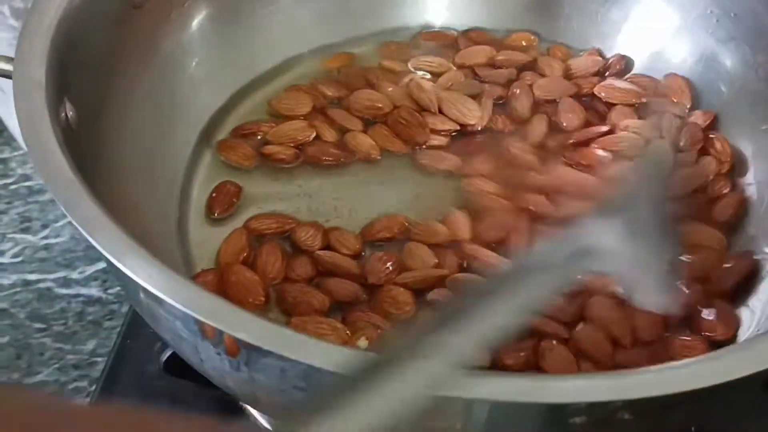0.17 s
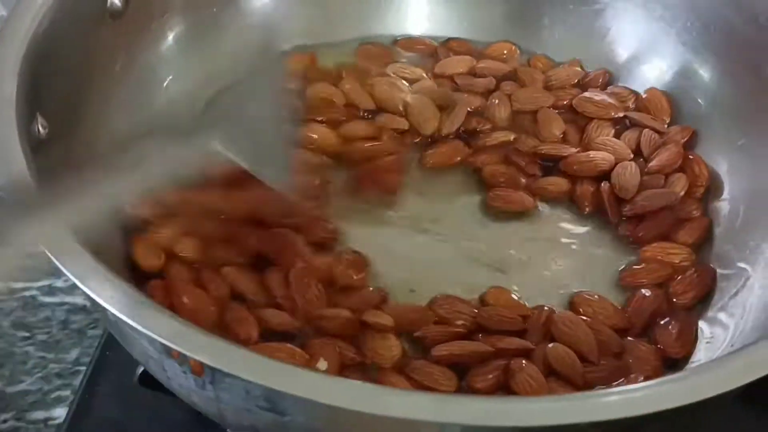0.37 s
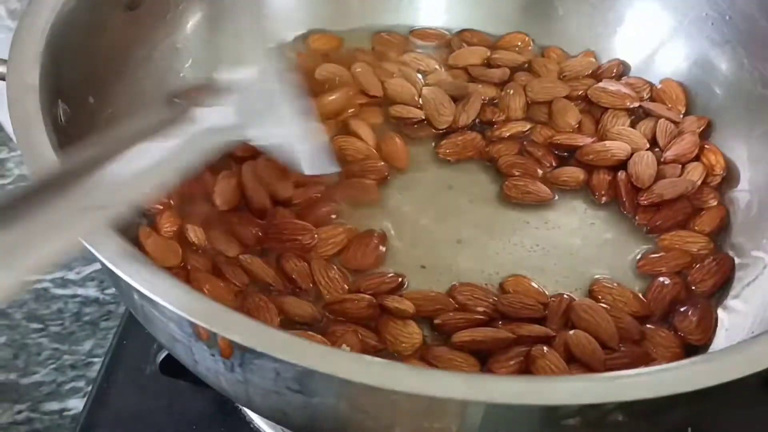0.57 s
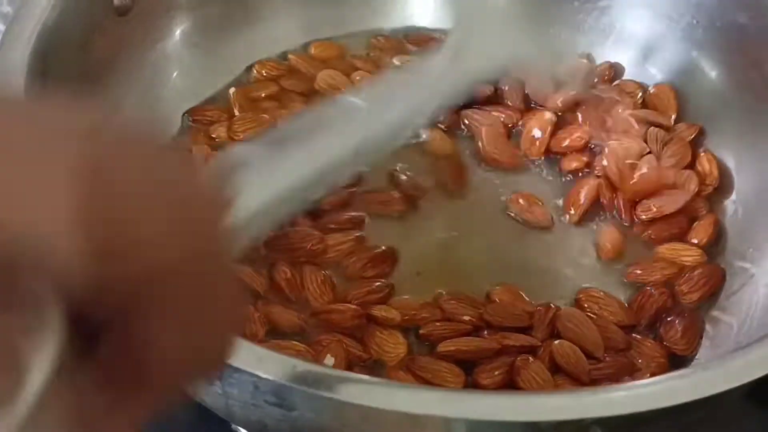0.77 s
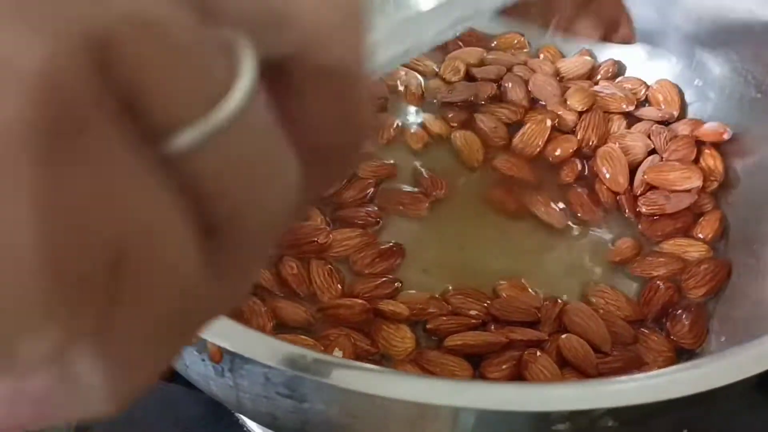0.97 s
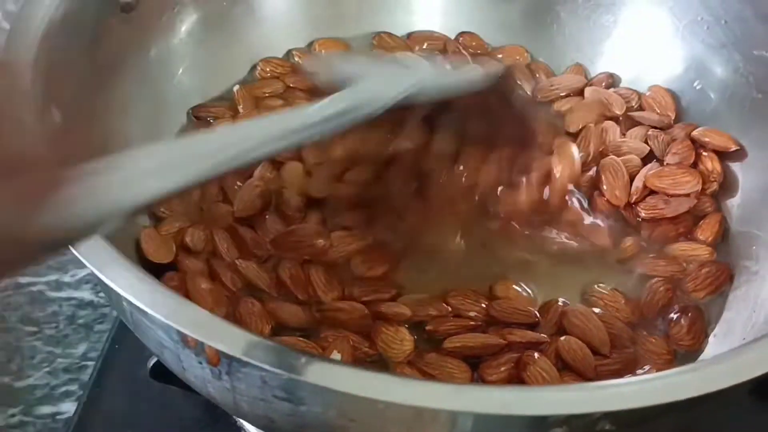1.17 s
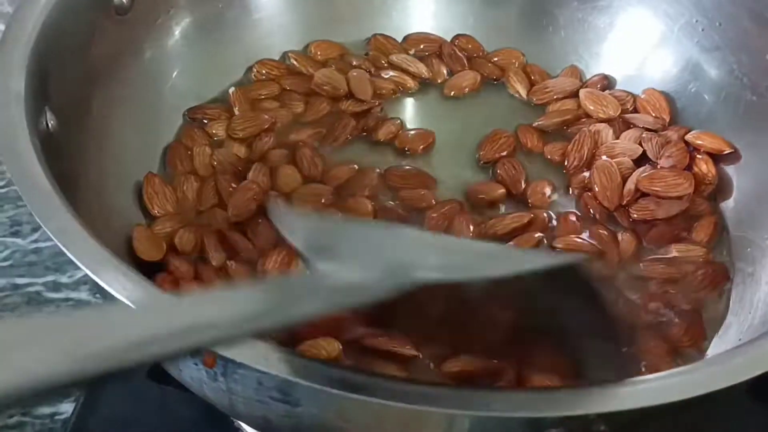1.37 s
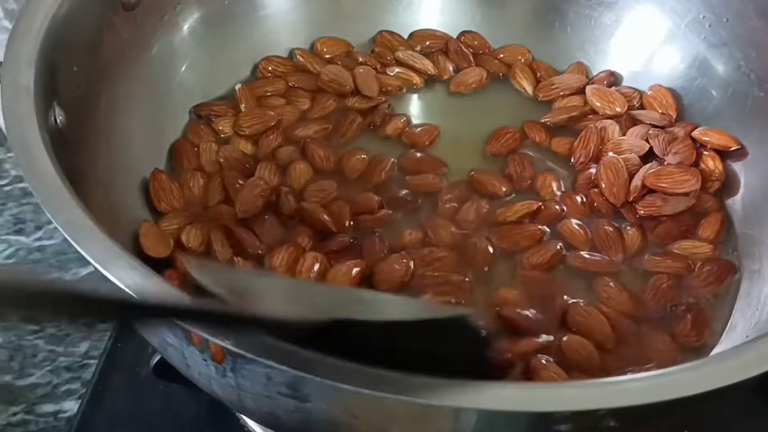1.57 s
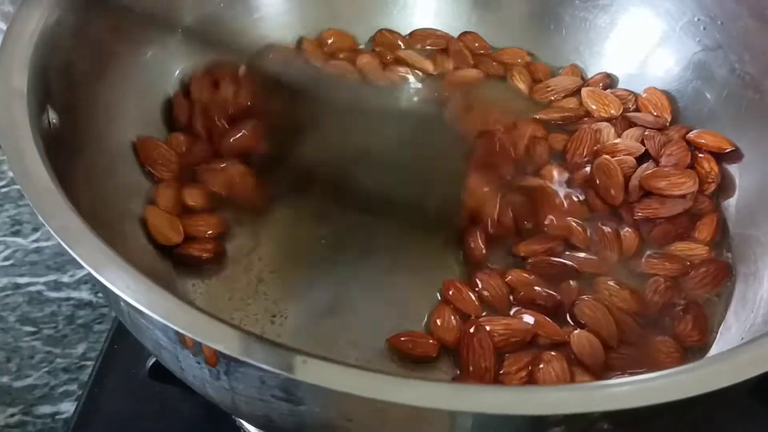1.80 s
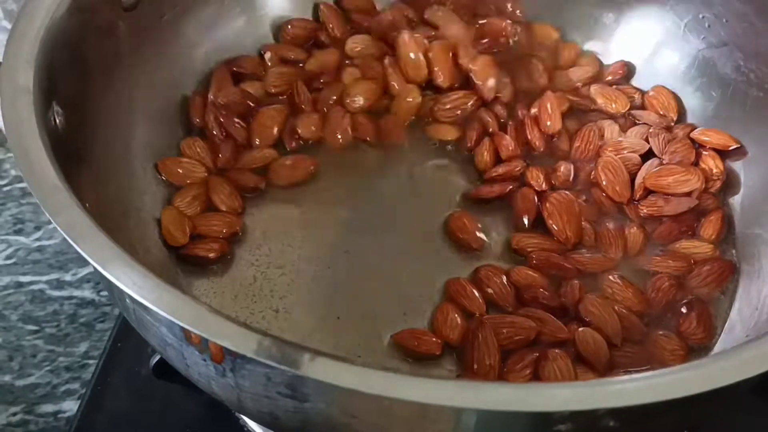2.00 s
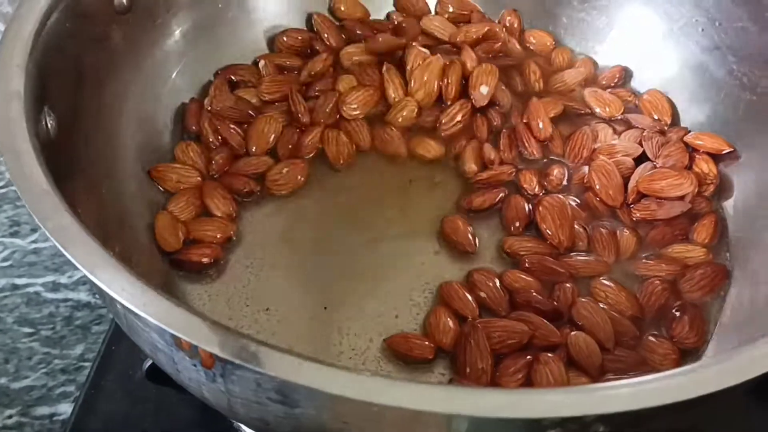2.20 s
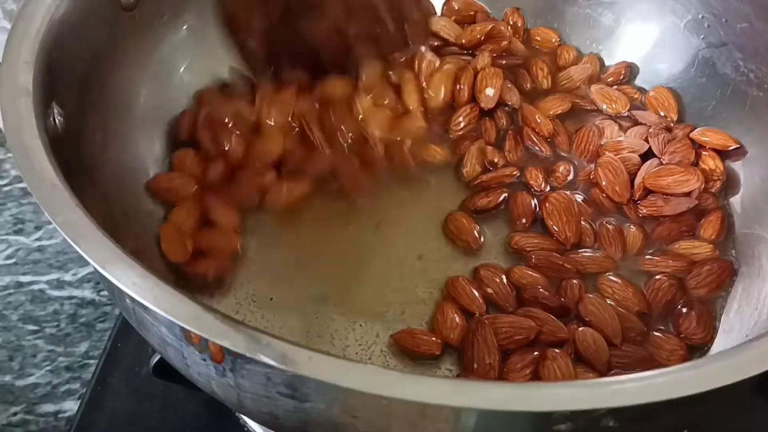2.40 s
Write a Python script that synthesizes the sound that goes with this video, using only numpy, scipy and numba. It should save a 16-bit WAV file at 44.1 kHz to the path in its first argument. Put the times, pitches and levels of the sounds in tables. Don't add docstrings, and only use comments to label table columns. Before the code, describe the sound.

Close stereo phone pickup, louder on the left, of a metal spoon scraping a ringing steel pan of nuts; sharp clinks, short singing tones and knocks, a momentary silence midway, then lighter strokes over faint kitchen noise.

```python
import sys
import numpy as np
from scipy import signal
from scipy.fft import rfft, irfft
from scipy.io import wavfile
from scipy.ndimage import uniform_filter1d
from numba import njit

SR = 44100
rng = np.random.default_rng(int(sys.argv[2]) if len(sys.argv) > 2 else 0)


def store_pcm(level_fs):
    pcm = np.round(np.clip(level_fs, -1, 1) * 32767).astype(np.int16)
    wavfile.write(sys.argv[1], SR, np.atleast_2d(pcm).T)


def linear_from_db(decibels):
    return 10 ** (np.asarray(decibels, float) / 20)


N = 108045

BOWL_LUCK = .4


# start_s,
# level_db, treble_tilt_db_per_octave, loudest_hz, ring_length_share
SPOON_CLINKS = [(0.0, -30.5, -4, 770, 0.57), (0.193, -30, 2, 2000, 0.67), (0.2145, -1.5, 1, 2940, 0.28),
                (0.67, -25.5, -1, 3500, 0.45), (0.86, -31, -1.5, 2970, 0.75),
                (0.989, -32, 3.5, 10800, 0.093), (1.071, -11.5, 10, 6750, 1), (1.091, -27, -5, 2290, 0.62),
                (1.211, -8.5, 8.5, 7220, 0.75), (1.241, -17.5, 14.5, 5920, 1), (1.314, -1.5, 1.5, 990, 0.1),
                (1.556, -27, -6.5, 1300, 0.67), (1.623, -46, -5, 1500, 0.14), (1.843, -15, 8.5, 2600, 0.53),
                (1.957, -27.5, 10.5, 12300, 0.96), (2.003, -28.5, -1.5, 2270, 0.28),
                (2.084, -25, -3, 2860, 0.081), (2.128, -7, 6, 2000, 0.2)]


def clinks(hz, db, t60, port):
    rows = np.array(SPOON_CLINKS)
    level_db, tilt_db, loudest_hz, ring_share = rows[:, 1], rows[:, 2:3], rows[:, 3:4], rows[:, 4:5]
    touch, at, latest = taps(rows, last_s=0.027, rise_s=1e-4)

    octaves_away = np.log2(hz / loudest_hz)
    region_db = 6 * np.exp(-.5 * (octaves_away / .25) ** 2)
    luck_db = 8.5 * (1 + hz / 6000) * rng.standard_normal((len(rows), len(hz))).clip(-2, 1.3)
    luck_db[:, :len(BOWL_TONES)] *= BOWL_LUCK
    gain = unit(linear_from_db(db + tilt_db * np.log2(hz / 2000) + region_db + luck_db), 0.56)
    ringing = ring(touch, latest, gain, poles(hz, t60 * ring_share), port)

    t = np.arange(N // 100) / SR
    crack_s, crack_hz = 0.0049, 5400
    band = signal.butter(2, [crack_hz / 4, crack_hz * 2], "band", fs=SR)
    burst = signal.lfilter(*band, rng.standard_normal((2, len(t)))) * np.exp(-t / crack_s)
    hit = np.zeros((1, N))
    hit[0, at] = linear_from_db(1.223 * level_db + 6.5 + 2 * rows[:, 2]) * (at > 0)
    crack = signal.fftconvolve(hit, burst, axes=1)[:, :N]
    return ringing + linear_from_db(-13.5) * crack


# start_s, level_db, treble_tilt_db_per_octave
RUB_STROKES = [
    [(0.0, -36.5, 3.5), (0.174, -52.5, 3.5), (0.21, -34, 5)],
    [(0.216, -24.5, 5), (0.25, -17, 3.5), (0.35, -21, 1.5), (0.4, -31, 5), (0.43, -30.5, 0.5),
     (0.665, -55.5, -3)],
    [(0.672, -44, -0.5), (0.82, -40.5, -3), (0.87, -41.5, 6.5), (0.93, -51.5, -5), (0.99, -40, -6),
     (1.065, -58.5, 5)],
    [(1.073, -14.5, 18.5), (1.2, -38.5, 3.5), (1.215, -19.5, -3.5), (1.305, -31.5, 11), (1.32, -29.5, 17.5),
     (1.387, -25.5, 3), (1.435, -30, 3.5)],
    [(1.558, -35, 4.5), (1.62, -38, 3), (1.635, -50, -4), (1.836, -53.5, -3.5), (1.838, -38, -8.5)],
    [(1.846, -28, 8), (1.945, -41, 11.5), (1.98, -33, 7), (2.04, -43, 2), (2.12, -36.5, -4.5)],
    [(2.13, -25, 7), (2.328, -49, 4.5), (2.45, -76, 14)],
]


def scrape(hz, db, t60, port):
    rub, t = np.concatenate(RUB_STROKES), np.arange(N) / SR
    slips_per_s, slip_spread_db, step_s, new_place_s = 1400, 3.5, .01, 0.064

    luck = rng.random((N, 3))
    size = linear_from_db(slip_spread_db * (-np.log(luck[:, 1])).clip(0, 4))
    slips = (luck[:, 0] < slips_per_s / SR) * size * np.sign(luck[:, 2] - .5)
    drive = slips / np.std(slips) * linear_from_db(np.interp(t, rub[:, 0], rub[:, 1]) - 5)

    steps = np.arange(0, t[-1] + step_s, step_s)
    place_index = (steps / new_place_s).astype(int).clip(0, 199)
    place = rng.standard_normal((2, 200, len(hz)))[:, place_index]
    place[:, :, :len(BOWL_TONES)] *= BOWL_LUCK
    pole = poles(hz * (1 + .002 * place[1]), .7 * t60)
    spread_db = 4 * (1 + hz / 6000) * place[0].clip(-2.5, 1.5)
    tilt_db = np.interp(steps, rub[:, 0], rub[:, 2])[:, None]
    gain = linear_from_db(db + tilt_db * np.log2(hz / 2000) + spread_db)
    gain = unit(gain, 1 / (1 - abs(pole) ** 2))
    return ring(drive, (t / step_s).astype(int), gain, pole, port)


# start_s, length_s, level_db, pitch_hz
SINGING_DRAGS = [(0.0, 0.081, -44.5, 770), (0.222, 0.087, -19, 770), (0.224, 0.032, -17.5, 1500),
                 (0.251, 0.022, -22, 1501), (0.295, .085, -35.5, 1463), (0.322, 0.057, -31, 3204),
                 (0.385, 0.021, -29, 1480), (0.41, 0.014, -24.5, 983), (0.416, 0.059, -32.5, 1980),
                 (0.327, 0.15, -39, 777.7), (0.671, 0.038, -35.5, 3030), (0.675, 0.062, -40, 1520),
                 (0.746, 0.019, -36, 1050), (0.798, 0.016, -31.5, 1027), (0.832, 0.056, -33.5, 2000),
                 (0.855, 0.066, -37, 993), (0.861, 0.1, -39.5, 1513), (0.856, 0.031, -35.5, 3000),
                 (0.862, 0.025, -44, 2450), (0.931, 0.13, -54.5, 5060), (0.954, 0.051, -40.5, 1563),
                 (1.075, 0.023, -25, 1576), (1.088, 0.047, -31.5, 2548), (1.106, .095, -28.5, 1411),
                 (1.067, 0.098, -36.5, 572.4), (1.21, 0.084, -34, 744), (1.221, 0.037, -29.5, 2000),
                 (1.314, 0.013, -17, 1072), (1.337, 0.019, -19, 1448), (1.347, 0.0055, -19.5, 2796),
                 (1.358, 0.02, -28, 722), (1.621, 0.058, -48, 998), (1.854, 0.079, -43.5, 2625),
                 (1.856, 0.079, -40, 1930), (1.875, 0.055, -40, 1320), (1.957, 0.055, -35, 2970),
                 (1.979, 0.063, -34.5, 2017), (1.99, 0.028, -38, 1500), (2.045, 0.037, -38.5, 2856),
                 (2.086, 0.013, -26, 2857), (2.115, 0.027, -43, 1487), (2.15, 0.029, -35.5, 2860),
                 (2.31, 0.0072, -27, 1257), (2.239, 0.13, -52, 747), (1.074, 0.081, -34, 2000),
                 (1.079, 0.083, -41.5, 1007), (1.086, 0.08, -35, 224.4)]


def drags():
    out = np.zeros((2, N + SR))
    smooth = int(0.0057 * SR)
    luck = rng.standard_normal((len(SINGING_DRAGS), 4, SR // 6))
    for (start_s, length_s, level_db, hz), noise in zip(SINGING_DRAGS, luck):
        t = np.arange(int(np.clip(length_s, .006, .16) * SR)) / SR
        grip = uniform_filter1d(uniform_filter1d(noise, smooth, axis=1), smooth, axis=1)
        grip = grip[:, :len(t)] / np.std(grip)
        shared_waver = 0.4 * (grip[0] + 1j * grip[1]) / 2
        side_waver = 0.51 * (grip[2:] + 1j * grip[:1:-1])
        swell = np.sin(np.pi * (t / t[-1]).clip(0, 1)).clip(0) ** 0.55
        tone = linear_from_db(level_db) * swell * np.exp(2j * np.pi * hz * t)
        port = plain_ports(np.array([hz]), 0)
        at = int(start_s * SR)
        out[:, at:at + len(t)] += (port * (1 + shared_waver + side_waver) * tone).imag
    return out[:, :N]


# start_s, level_db, pitch_hz, time_to_fade_60_db_s
NUT_KNOCKS = [(0.0, -32.5, 2000, 0.35), (0.0, -43.5, 998, 0.52), (0.836, -23, 1042, 0.038),
              (1.315, -5.5, 1130, 0.05), (1.325, -28.5, 297, 0.34), (1.639, -29.5, 1486, 0.05),
              (1.709, -30.5, 2045, 0.052), (1.776, -31, 2324, 0.037), (1.846, -33.5, 3605, 0.47),
              (1.888, -43, 572, 0.21), (2.084, -28, 1042, 0.091), (2.129, -20.5, 1034, 0.064),
              (2.185, -32.5, 1011, 0.12), (2.267, -12.5, 1221, 0.024)]


def nuts():
    ratio = np.array([1, .93, 1.08, 1.2, .8])
    tone_db = np.array([0, -8, -8, -11, -11])
    t, out = np.arange(SR // 3)[:, None] / SR, np.zeros((2, N + SR))
    rise = 1 - np.exp(-t / .004)
    luck = rng.random((len(NUT_KNOCKS), 2, len(ratio)))
    for (start_s, level_db, hz, t60), u in zip(NUT_KNOCKS, luck):
        tone_hz = hz * ratio * np.r_[1, 1 + .05 * (u[0, 1:] - .5)]
        ring_s = np.r_[t60, np.full(len(ratio) - 1, min(t60, .06))]
        start_phase = np.exp(2j * np.pi * u[1])
        tones = poles(tone_hz, ring_s) ** (t * SR) * rise * linear_from_db(level_db + tone_db) * start_phase
        at = int(start_s * SR)
        out[:, at:at + len(t)] += (plain_ports(tone_hz, 3.5) @ tones.T).imag
    return out[:, :N]


# pitch_hz, level_db, time_to_fade_60_db_s
BOWL_TONES = [(571, -5.5, 0.22), (770, -3.5, 0.36), (969, -3, 0.57), (1009, 3.5, 0.6), (1080, 3, 0.14),
              (1448, 7, 0.2), (1555, 2, 0.6), (1715, 0, 0.23), (2020, 8.5, 0.25), (2466, -11.5, 1),
              (2600, -23.5, 0.57), (2960, -0.5, 0.21), (3155, 4, 0.17), (6010, -1, 0.051)]
# pitch_hz, level_db
WALL_LEVEL = [(250, -17.5), (600, -12), (1000, -3.5), (1600, 4), (3000, 2), (6000, 6), (9000, -16),
              (13000, -32.5), (15500, -27.5)]
# pitch_hz, time_to_fade_60_db_s
WALL_RING = [(300, 0.94), (1500, 0.44), (5000, 0.11), (10000, 0.21), (16000, 0.26)]
# pitch_hz, width_hz, lift_db
WALL_GROUPS = [(1500, 100, 13.5), (2000, 110, 11), (2460, 55, 9), (3030, 200, 9.5), (3677, 270, 6),
               (4660, 200, 5)]


def body(count=300):
    luck = rng.random((count, 2))
    hz = 250 + (15800 - 250) * ((np.arange(count) + luck[:, 0]) / count) ** 1.7
    spacing_db = 10 * np.log10(np.gradient(hz).clip(5) / 30)
    db = read(WALL_LEVEL, hz) - read(WALL_LEVEL, 1500) - 20.5 + spacing_db - 2.5
    for mid_hz, width_hz, lift_db in WALL_GROUPS:
        db = db + lift_db * np.exp(-.5 * ((hz - mid_hz) / width_hz) ** 2)
    t60 = read(WALL_RING, hz) * (.35 + .9 * luck[:, 1])
    bowl_hz, bowl_db, bowl_t60 = np.array(BOWL_TONES).T
    return np.r_[bowl_hz, hz], np.r_[bowl_db - bowl_db.mean() - 10, db], np.r_[bowl_t60, t60]


# pitch_hz, left_over_right_db
LEFT_LOUDER = [(300, 9), (800, 11.5), (2500, 7.5), (6000, 2), (14000, 3.5)]


def left_right(hz, half):
    lag_s = .00115
    return np.array([half * np.exp(-2j * np.pi * hz * lag_s), 1 / half])


def plain_ports(hz, extra_db):
    return left_right(hz, linear_from_db(read(LEFT_LOUDER, hz) / 2 + extra_db))


def ports(hz):
    odd = rng.standard_normal((2, len(hz)))
    level = linear_from_db(read(LEFT_LOUDER, hz) / 2 + 2 * odd[0] / 2)
    return left_right(hz, level * np.exp(.5j * 1.2 * odd[1]))


def taps(rows, last_s, rise_s):
    at = (rows[:, 0] * SR).astype(int)
    t = np.arange(SR // 16) / SR
    shape = np.exp(-t / last_s) * (1 - np.exp(-(t + 1 / SR) / rise_s))
    touch = rng.standard_normal((len(rows), len(t))) * shape
    touch[:, 0] += .5 * np.sqrt(np.sum(touch ** 2, axis=1))
    touch = touch * linear_from_db(rows[:, 1:2]) / np.sqrt(np.sum(touch ** 2, axis=1, keepdims=True))
    x = np.zeros(N + len(t))
    for start, one_touch in zip(at, touch):
        x[start:start + len(t)] += one_touch
    latest = np.searchsorted(at, np.arange(N), "right") - 1
    return x[:N], at, np.clip(latest, 0, None)


@njit
def ring(x, part, gain, pole, port):
    out = np.zeros((2, len(x)))
    for m in range(gain.shape[1]):
        z = 1e-12j
        for i in range(len(x)):
            z = z * pole[part[i], m] + x[i] * gain[part[i], m]
            out[0, i] += (z * port[0, m]).imag
            out[1, i] += (z * port[1, m]).imag
    return out


def poles(hz, t60):
    return np.exp((2j * np.pi * hz - np.log(1000) / np.clip(t60, .004, 5)) / SR)


def unit(gain, keep):
    return gain / np.sqrt(np.sum(gain ** 2 * keep, axis=1, keepdims=True) / 2)


def read(table, hz):
    table = np.array(table)
    return np.interp(np.log(hz), np.log(table[:, 0]), table[:, 1])


def colour(x, table):
    y = irfft(rfft(x) * linear_from_db(read(table, np.fft.rfftfreq(N, 1 / SR) + 1)), N)
    return y / np.std(y)


def tile_echo(pan):
    t = np.arange(SR // 2) / SR
    room_t60_s = 0.3
    echo = rng.standard_normal((2, len(t))) * linear_from_db(-60 * t / room_t60_s) * (t > .003)
    echo = signal.lfilter([.5], [1, -.7], echo)
    echo = echo / np.sqrt(np.sum(echo ** 2) / 2)
    return linear_from_db(-12) * signal.fftconvolve(pan, echo, axes=1)[:, :N]


# pitch_hz, level_db
ROOM_NOISE = [(30, -9.5), (150, 6), (500, -2.5), (1200, 5.5), (2500, -0.5), (5000, -29), (10000, -55),
              (15500, -36)]
# start_s, level_db
PAN_RUMBLE = [
    (0.0, -67),
    (0.28, -65),
    (1.399, -60),
    (2.242, -57.5),
    (2.45, -67.5),
]


def kitchen():
    mid, side = rng.standard_normal((2, N))
    air = colour(np.array([mid + 3.1 * side, mid - 5.4 * side]), ROOM_NOISE)
    rumble = np.array(PAN_RUMBLE)
    shaking = rng.standard_normal(N) + 0.11 * rng.standard_normal((2, N))
    low = colour(shaking, [(30, -12), (85, 11.5), (160, 10), (300, 2.5), (600, -15.0)])
    rumble_db = np.interp(np.arange(N) / SR, rumble[:, 0], rumble[:, 1])
    return linear_from_db(-59.5) * air + low * linear_from_db(rumble_db)


def scene():
    hz, db, t60 = body()
    port = ports(hz)
    pan = linear_from_db(-8.5) * clinks(hz, db, t60, port) + scrape(hz, db, t60, port) + nuts() + drags()
    ceiling = .66
    loud = ceiling * np.tanh((pan + tile_echo(pan)) / ceiling)
    mic_low_cut = signal.butter(3, 420, "high", fs=SR, output="sos")
    return signal.sosfilt(mic_low_cut, loud) + kitchen()


def starve(x):
    hz, t, z = signal.stft(x, SR, nperseg=1024)
    power = np.mean(abs(z) ** 2, axis=0)
    total = power.sum(0)
    patches = rng.standard_normal((len(hz) // 12 + 1, len(t) // 4 + 1))
    chance = np.kron(patches, np.ones((12, 4)))[:len(hz), :len(t)]
    sill = total ** 1.6 * linear_from_db(2 * (-40 + 12 + 7 * chance))
    rising = total > 4 * np.roll(total, 2)
    keep = (uniform_filter1d(power, size=5, axis=0) > sill) | (hz[:, None] < 6300) | rising
    return signal.istft(z * keep, SR, nperseg=1024)[1][:, :N]


def dropouts():
    t = np.arange(N) / SR
    cut_s, mute_s, back_s = 1.438, 1.466, 1.5545
    fade_db = -20 - 600 * (t - cut_s) - 80 * (t > mute_s)
    db = np.where((t > cut_s) & (t < back_s), fade_db, 0)
    dip_s, dip_fade_s = 1.621, .013
    db = db + (t > dip_s) * -28 * np.clip(1 - (t - dip_s) / dip_fade_s, 0, 1)
    return linear_from_db(db)


def band_limit(x):
    return signal.sosfilt(signal.butter(12, 16810, fs=SR, output="sos"), x)


def record(dry):
    hiss_high_pass = signal.butter(2, 8000, "high", fs=SR)
    hiss = linear_from_db(-78) * signal.lfilter(*hiss_high_pass, rng.standard_normal(dry.shape))
    top_cut = signal.ellip(6, .3, 30, 15900, fs=SR, output="sos")
    dull = signal.sosfilt(top_cut, dry + hiss)
    return band_limit(starve(dull) * dropouts())


dry = scene()
out = record(dry)
store_pcm(out)
```